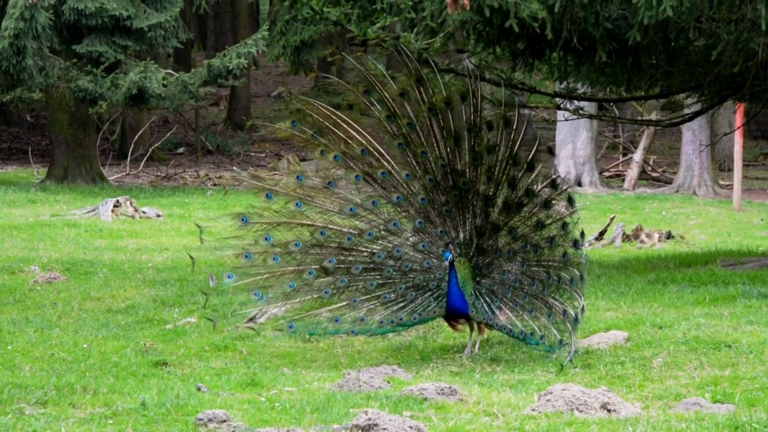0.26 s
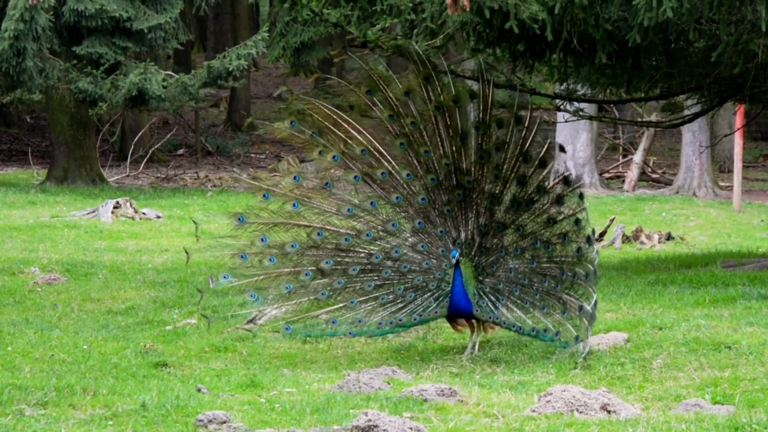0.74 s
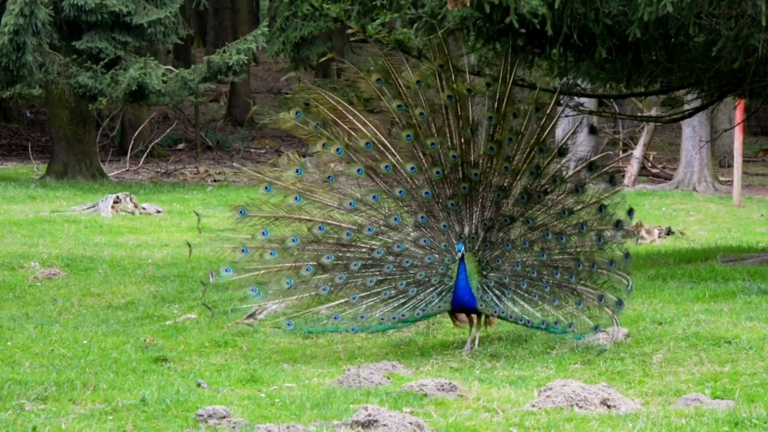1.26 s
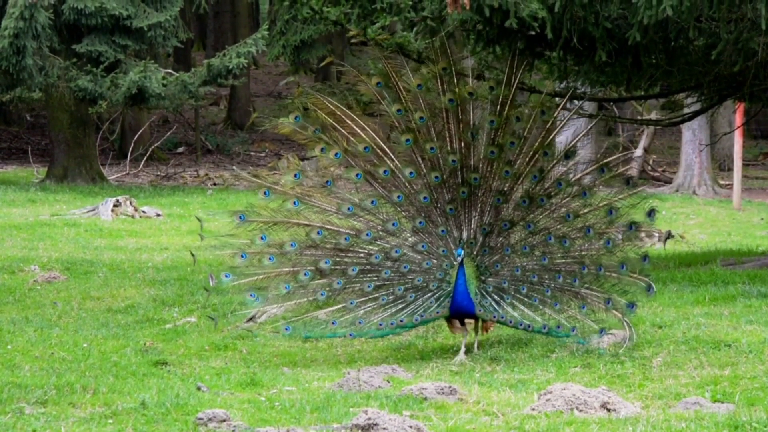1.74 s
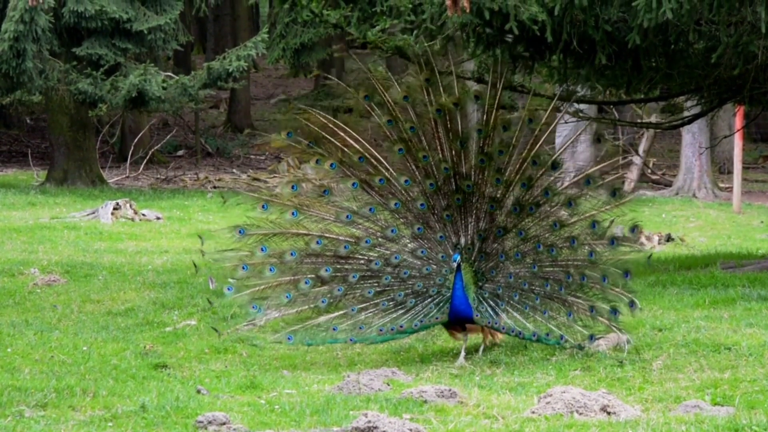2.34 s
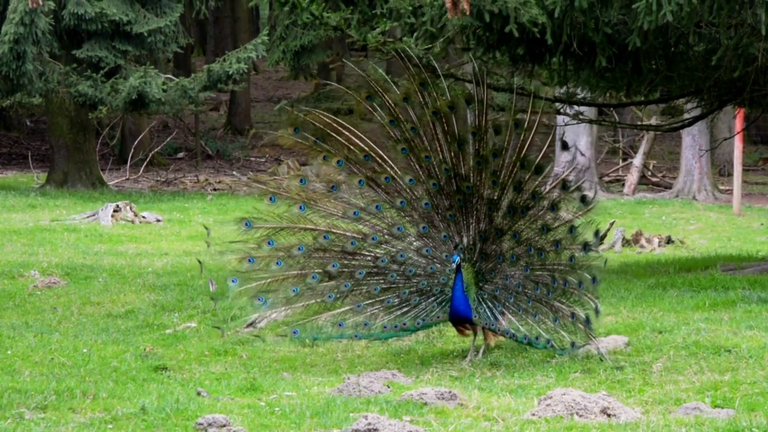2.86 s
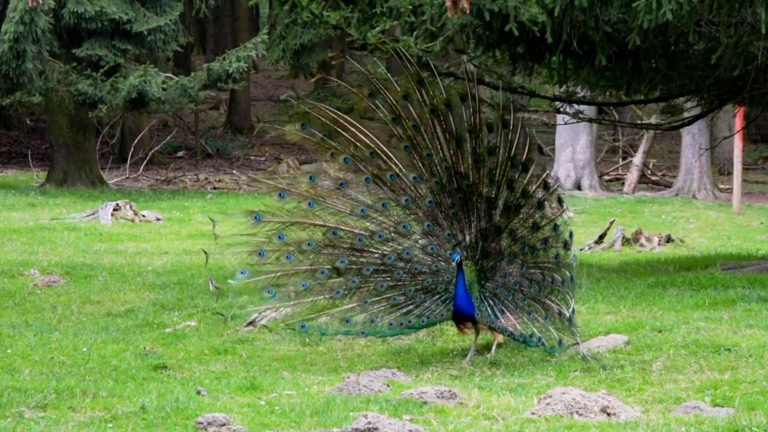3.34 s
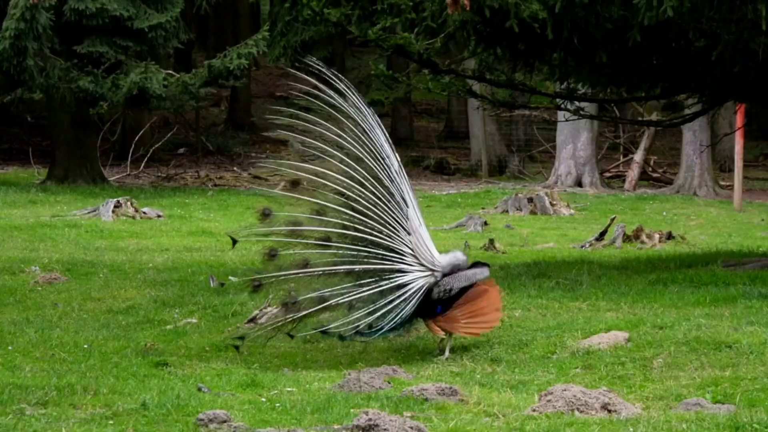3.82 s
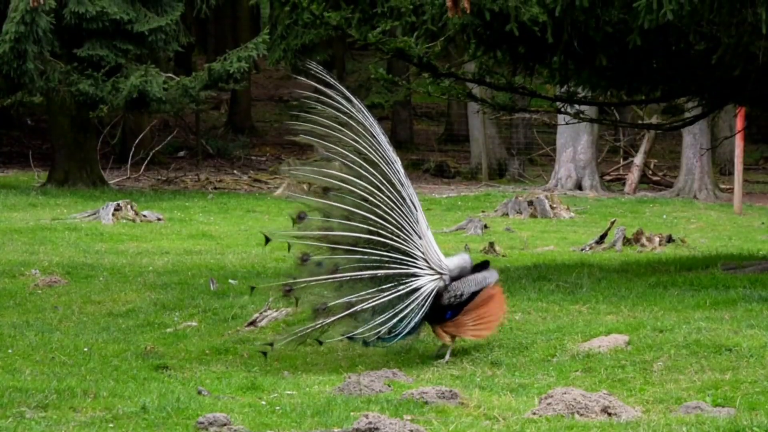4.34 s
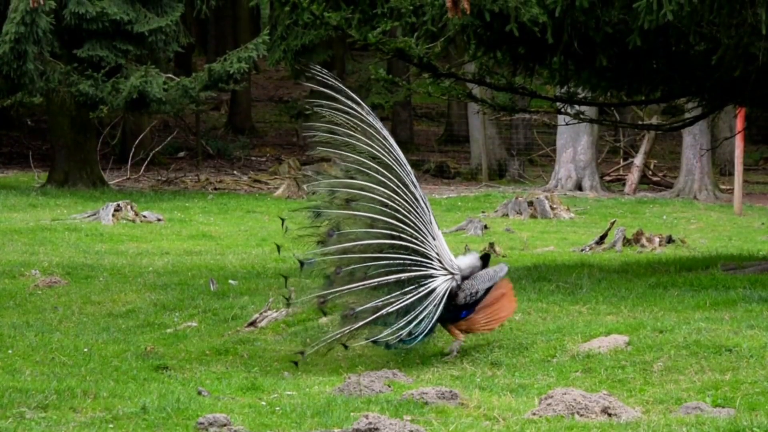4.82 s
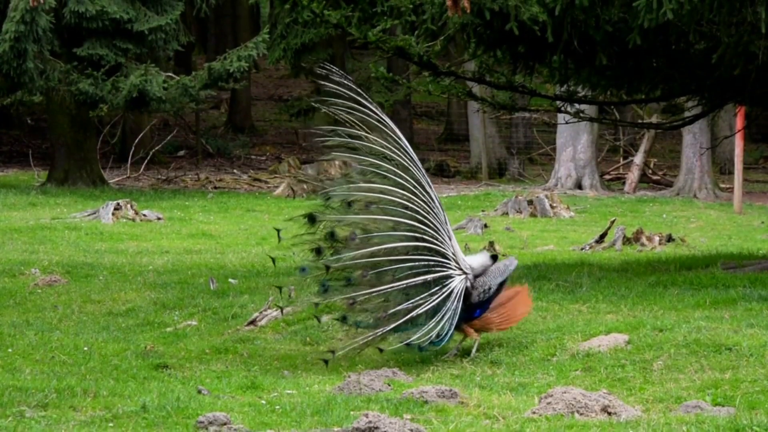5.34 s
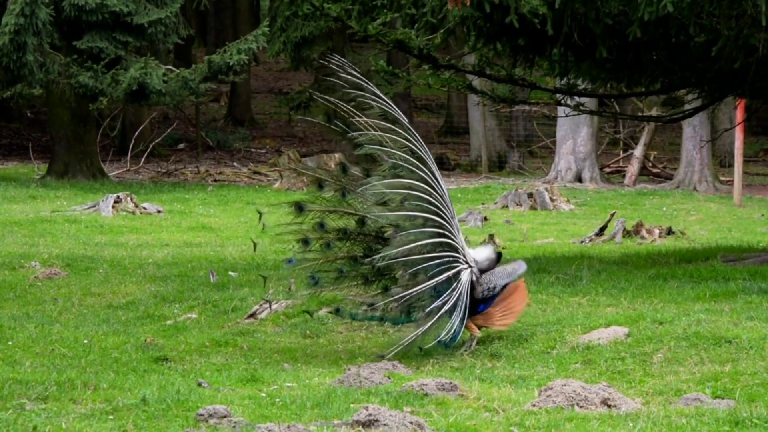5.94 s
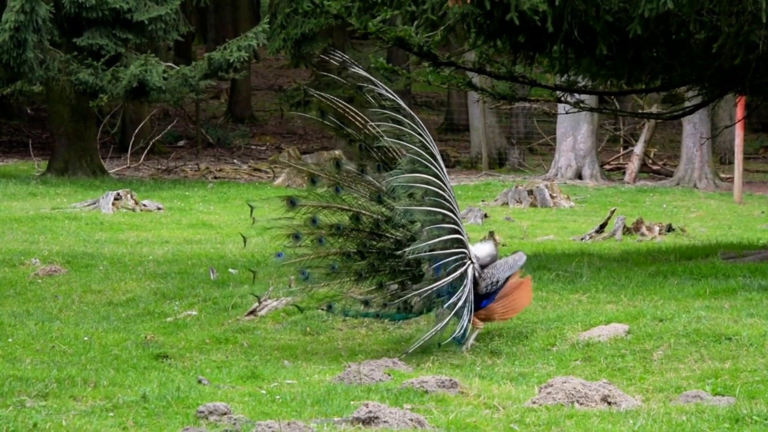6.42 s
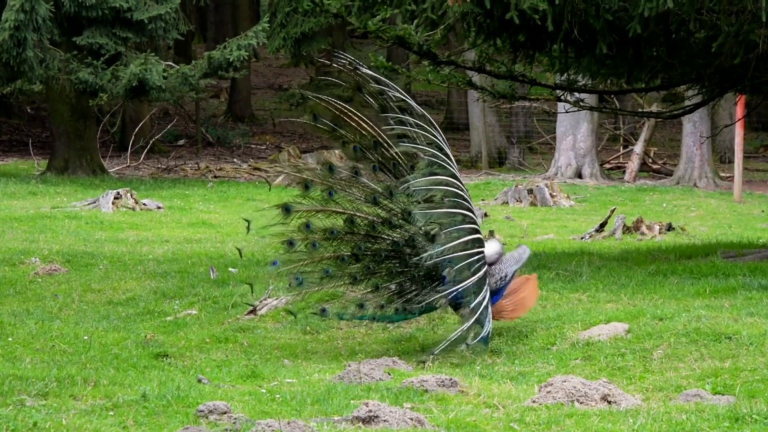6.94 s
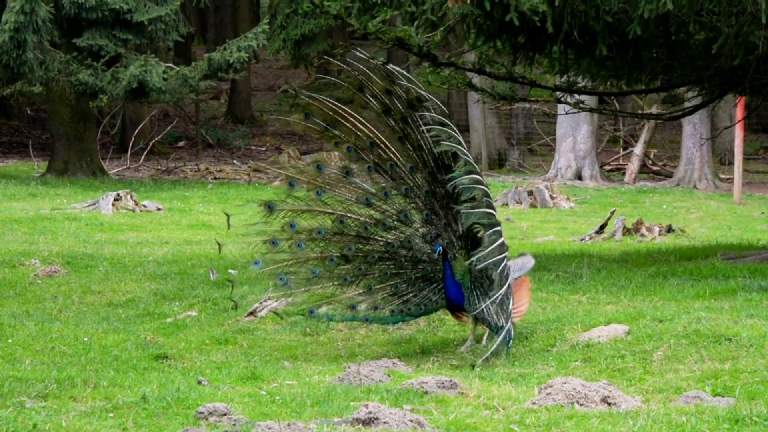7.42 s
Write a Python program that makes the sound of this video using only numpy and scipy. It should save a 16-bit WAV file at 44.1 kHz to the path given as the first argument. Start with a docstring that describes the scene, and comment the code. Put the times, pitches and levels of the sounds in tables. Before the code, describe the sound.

Close, clear outdoor pickup with almost no echo: loud, honking peacock wails separated by one to two seconds of near silence. Faint scratchy chirps of high hiss flit between and under them, slightly wide in stereo. A barely audible insect-like shimmer and weak low hum sit beneath. A crisp double click comes late, before the last cry.

```python
"""Outdoors, perhaps near trees: a peacock repeats one and the same wailing cry five times, close and dry,
the first already under way. The cry is a stack of throbbing partials, smeared by hoarseness.
Raspy bursts of treble hiss, perhaps small birds, are noise through a sliding resonance.
Below them: a faint insect-like band, a weak low hum and quiet air of shaped noise, and one double tick
of short ringing modes. Hiss and background drop out once, briefly."""
import sys
import numpy as np
from scipy import signal
from scipy.io import wavfile
from scipy.ndimage import uniform_filter1d

SR = 44100
rng = np.random.default_rng(int(sys.argv[2]) if len(sys.argv) > 2 else 0)


def unload_audio(sound):
    """Save the sound as a 16-bit wav file, at the path given as the first command line argument."""
    columns = np.transpose(np.atleast_2d(sound))
    # keep every value between -1 and 1, then stretch to whole-number steps
    steps = np.round(np.clip(columns, -1, 1) * 32767)
    wavfile.write(sys.argv[1], SR, steps.astype(np.int16))


N = 338688


def amp(db):
    """dB to amplitude."""
    return 10 ** (np.asarray(db) / 20)


def evened(x):
    """Scale to rms 1."""
    return x / np.sqrt(np.mean(x ** 2) + 1e-20)


def read(points, hz):
    """Interpolate a (f/Hz, value) table over log frequency."""
    f, value = np.transpose(points)
    return np.interp(np.log(hz + 1), np.log(f + 1), value)


def unit(db):
    """Spectrum columns scaled so that each frame has rms 1."""
    gain = amp(db)
    return gain / np.sqrt(np.mean(gain ** 2, axis=0)) / np.sqrt(len(gain))


def wander(count, width_hz):
    """Complex low-passed noise of rms 1; multiplying a tone by it smears the tone."""
    z = rng.standard_normal(count) + 1j * rng.standard_normal(count)
    z = signal.sosfilt(signal.butter(4, width_hz, fs=SR, output="sos"), z)
    return z / np.sqrt(np.mean(abs(z) ** 2))


def drift(t, span_s):
    """Slow random course of rms 1 that changes within about span_s."""
    return evened(uniform_filter1d(rng.standard_normal(len(t)), size=int(span_s / t[1]) + 1))


def patches(hz, t, bins, frames):
    """Random time-frequency map of rms 1, smoothed over bins and frames."""
    grid = rng.standard_normal((len(t), len(hz))).T
    grid = uniform_filter1d(grid, size=bins, axis=0)
    return evened(uniform_filter1d(grid, size=frames, axis=1))


def noise(shape, size, same):
    """Stereo noise from random short-time spectra; shape(hz, t) gives rms per bin, same the likeness."""
    hop = size // 4
    hz = np.fft.rfftfreq(size, 1 / SR)[:, None]
    t = np.arange(N // hop + 5) * hop / SR
    a, b, c, d = rng.standard_normal((len(t), len(hz), 4)).T
    same = np.clip(read(same, hz), 0, 1)
    mid = np.sqrt((1 + same) / 2) * (a + 1j * b)
    side = np.sqrt((1 - same) / 2) * (c + 1j * d)
    z = np.array([mid + side, mid - side]) * shape(hz, t)
    out = signal.istft(z, nperseg=size, noverlap=size - hop)[1][:, :N]
    return out * np.sqrt(3 / 2)  # window gain


# hum course: t/s, level/dB (before the waver)
HUM_LEVELS = [(0, -93.5), (1.5, -89), (2, -94), (3.5, -90), (4.5, -90.5), (5.62, -93), (5.8, -76),
              (6.5, -79), (7.06, -76), (7.68, -88)]
# air spectrum: f/Hz, relative level/dB
AIR_SPECTRUM = [(12, -36), (20, -3.5), (49, -17), (349, -6.5), (931, -20.5), (1620, -19.5), (2170, -12),
                (2680, -21), (3990, -8), (5210, -15), (6430, -1), (8170, -18), (11200, -18), (14600, -54),
                (22000, -120)]
HUM_SWING_DB, AIR_DB = 3.5, -76


def background():
    """Wavering narrow-band hum over quiet air, both patchy noise."""
    def shape(hz, t):
        patch = patches(hz, t, bins=30, frames=6)
        hum_band = unit(-30 * np.log10(1 + ((hz - 135) / 28) ** 2) - 12 * (hz < 100))
        hum_db = np.interp(t, *np.transpose(HUM_LEVELS)) + HUM_SWING_DB * drift(t, .1)
        hum = amp(hum_db) * amp(1.4 * patch) * hum_band
        air = amp(AIR_DB + 4.4 * patch) * unit(read(AIR_SPECTRUM, hz))
        return hum + air
    return noise(shape, size=2048, same=[(100, 0.97), (1000, 0.9), (5000, 0.77)])


# bursts: start t/s, length/s, level/dB, resonance start f/Hz, end f/Hz,
#         upper band/dB, lower band/dB (bands re resonance)
RASP_BURSTS = [(0.474, 0.094, -76, 5340, 5600, 1, 6), (0.718, 0.05, -69, 5600, 5800, -2, 3),
               (0.775, 0.17, -49.5, 5630, 4900, -5.5, -37), (0.937, 0.19, -67, 5300, 6060, -15, -8),
               (1.175, 0.21, -47.5, 5230, 5100, -9.5, -19), (1.99, .15, -78.5, 5400, 5600, -24, -1.5),
               (2.228, .13, -65.5, 5630, 5930, 3.5, -6), (2.576, 0.089, -81, 6700, 6700, 2, -5),
               (2.738, 0.18, -49.5, 5800, 5400, -6.5, -21.5), (3.644, 0.16, -52, 5320, 5120, -5, -30),
               (3.839, 0.16, -50, 6030, 4700, -15, -31), (3.989, 0.16, -53, 6120, 5260, -4.5, -16.5),
               (4.216, 0.16, -54, 5700, 5130, -4, -23), (4.4, 0.086, -71.5, 6200, 6000, -16, -9),
               (4.505, 0.13, -68.5, 5650, 5400, -17, -20), (5.272, 0.2, -50, 5430, 4870, -14, -19.5),
               (5.832, 0.17, -54, 4960, 5150, -8, -17), (6.03, 0.18, -51, 6430, 4760, -7, -22),
               (6.239, 0.034, -67.5, 5200, 5250, 5.5, -20.5), (6.444, .06, -59.5, 5800, 6970, -24, -41),
               (6.505, 0.061, -62, 4740, 4700, -10, -13), (6.564, .14, -71, 5170, 6500, -6, -5),
               (6.747, 0.15, -55, 5200, 4960, -5.5, -22.5), (6.9, 0.13, -72, 5600, 6000, 8.5, -7),
               (7.61, 0.11, -49, 5100, 5100, -11, -14) ]
# band spectra: f/Hz, relative level/dB
UPPER_BAND = [(3820, -31), (6500, -6.5), (7290, -2.5), (7590, -3), (8390, 0), (8950, -0.5), (9140, -4.5),
              (10100, 2), (11200, -4.5), (14600, -34.5), (22000, -120)]
LOWER_BAND = [(700, -71), (1400, -30), (2000, -12), (2800, -10), (3700, -0.5), (4400, 0.5), (5200, -29.5),
              (7000, -60.5)]
# left-right likeness: f/Hz, likeness (0-1)
RASP_LIKENESS = [(2000, 1), (5000, 0.52), (10000, 0.33), (12000, 1)]
RASP_RISE_S, RASP_FALL_S, RASP_EDGE_DB, RASP_WIDTH_HZ = 0.042, 0.052, -12, 800
FAINT_DB, FAINT_HZ, FAINT_WIDTH_HZ = -81.5, 6430, 350  # insect-like band
FAINT_SIDES_DB, FAINT_SWING_DB = -10.5, 7


def rasps():
    """Patchy hiss through a sliding resonance with bands above and below, plus the faint band."""
    start, length, level_db, from_hz, to_hz, upper_db, lower_db = np.transpose(RASP_BURSTS)[:, :, None]

    def shape(hz, t):
        since, left = t - start, start + length - t
        edge = np.maximum(np.maximum(1 - since / RASP_RISE_S, 1 - left / RASP_FALL_S), 0)
        bursts = amp(level_db + RASP_EDGE_DB * np.minimum(edge, 8) ** 2.4)
        faint = amp(FAINT_DB + FAINT_SWING_DB * drift(t, 0.091))
        slide_hz = from_hz + (to_hz - from_hz) * np.clip(since / length, 0, 1)
        # level-weighted mean of bursts and faint band
        level = bursts.sum(0) + faint
        centre_hz = ((bursts * slide_hz).sum(0) + faint * FAINT_HZ) / level
        width_hz = (bursts.sum(0) * RASP_WIDTH_HZ + faint * FAINT_WIDTH_HZ) / level
        upper = (bursts * amp(upper_db)).sum(0) + faint * amp(FAINT_SIDES_DB)
        lower = (bursts * amp(lower_db)).sum(0) + faint * amp(FAINT_SIDES_DB)
        core = unit(-24 * np.log10(1 + ((hz - centre_hz) / width_hz) ** 2) - 14 * (hz < 4200))
        bands = upper * unit(read(UPPER_BAND, hz)) + lower * unit(read(LOWER_BAND, hz))
        flicker = amp(5.4 * patches(hz, t, bins=2, frames=9) + 0.74 * drift(t, .012))
        return flicker * (level * core + bands)
    return noise(shape, size=256, same=RASP_LIKENESS)


# ticks: t/s, peak level/dB
TICK_TIMES = [(5.75, -34.5), (5.7529, -27)]
# ringing modes: f/Hz, relative level/dB, t60/s
TICK_RINGING = [(2400, -6, 0.0046), (4850, -1, 0.002), (10300, 1.5, 0.0039), (13900, -12, .003)]


def ticks():
    """Two dry ticks, each a sum of short decaying modes."""
    t, out = np.arange(600) / SR, np.zeros(N)
    ring = sum(amp(db - 60 * t / t60) * np.sin(2 * np.pi * hz * t) for hz, db, t60 in TICK_RINGING)
    ring *= np.minimum(t / 0.00037, 1)  # attack
    for s, db in TICK_TIMES:
        out[round(s * SR):][:len(t)] += amp(db) * ring / abs(ring).max()
    return out


# one cry: t/s, pitch f/Hz, partial 1 level/dB, partial 2 level/dB, partial 3 level/dB, treble level/dB
CRY_COURSE = [(.052, 588, -74, -72, -72, -65), (.07, 593.3, -46, -39, -80, -69.5),
              (.118, 601.2, -37.5, -31, -66, -46.5), (.132, 612.7, -41, -23, -54, -45),
              (.14, 612, -45.5, -13, -45, -27), (0.154, 639, -47.5, -10, -40, -30.5),
              (.26, 659, -40, -10.5, -33.5, -23), (.31, 653.6, -39, -13.5, -29, -21.5),
              (.345, 646.6, -35.5, -13, -20.5, -20), (.39, 643.5, -35.5, -12, -23.5, -20),
              (.45, 656.3, -34.5, -14, -20, -21.5), (.56, 662.2, -28.5, -17.5, -18.5, -19.5),
              (.63, 664.2, -28.5, -15.5, -16.5, -20), (.68, 661.3, -29, -14, -21, -21.5),
              (0.732, 648.5, -29, -18.5, -25, -23.5), (.765, 637, -34, -16.5, -24, -29),
              (.795, 618, -44.5, -37, -45, -44.5), (0.829, 650, -60.5, -34.5, -52.5, -48.5),
              (.885, 654, -62, -55.5, -52, -52), (.905, 640, -96, -49, -68, -67)]
# treble share, a row per partial 4-16, a column per beak posture: level/dB
BEAK_SHARES = [(-12, -8, -18.5, -13, -11), (-15, -9.5, -6, -9.5, -13), (-4.5, -15.5, -18.5, -6.5, -8),
               (-12, -5, -7, -20, -10), (-29.5, -16.5, -9.5, -9, -8), (-16, -9.5, -20.5, -11, -8),
               (-13.5, -14.5, -6, -13, -14.5), (-23, -10, -16.5, -14, -11.5),
               (-24.5, -15.5, -11.5, -15.5, -9), (-13.5, -21.5, -17, -20, -21.5),
               (-23, -17.5, -18, -18, -18.5), (-22, -21, -14.5, -16.5, -18.5),
               (-25, -19, -16.5, -19.5, -17.5)]
# postures reached: t/s
POSTURE_TIMES = [.14, .31, .495, .59, .71]
TREBLE_OPEN_S, TREBLE_SHUT_S = 0.13, 0.75
FADE_S, FADE_HALF_S, FADE_DB = .495, .022, -16  # partial 4 dips briefly


def contours(t):
    """Pitch and the levels of the 16 partials; the beak posture shares out the treble."""
    s, *columns = np.transpose(CRY_COURSE)
    hz, first_db, second_db, third_db, treble_db = (np.interp(t, s, c) for c in columns)
    treble_db = treble_db - 1200 * np.maximum(TREBLE_OPEN_S - t, 0)  # dB/s
    treble_db = treble_db - 60 * np.maximum(t - TREBLE_SHUT_S, 0)
    levels_db = [first_db, second_db, third_db]
    levels_db += [treble_db + np.interp(t, POSTURE_TIMES, db) for db in BEAK_SHARES]
    levels_db[3] = levels_db[3] + FADE_DB * np.exp(-((t - FADE_S) / FADE_HALF_S) ** 2)
    return hz, levels_db


# throb rate: t/s, rate f/Hz
THROB_RATE = [(.15, 53.7), (.29, 45), (.45, 45), (.685, 46.3), (.81, 55.4), (.9, 56)]
# throb: t/s, depth in partials 1-2 (0-1), depth above (0-1), pitch swing/Hz
THROB_DEPTH = [(.07, .8, .3, 3), (.125, .7, .3, 3), (.15, .22, .1, 3), (.31, .15, .45, 3),
               (.345, .04, .12, 2.5), (.5, .04, .12, 2), (.66, .03, .1, 1.5), (.77, .3, .3, 3),
               (.9, .45, .3, 3)]
THROB_START_TURNS = .727


def throb(t, hz):
    """Throb phase, its depths, and the running pitch phase that swings with it."""
    when, *depths = np.transpose(THROB_DEPTH)
    low_depth, high_depth, swing_hz = (np.interp(t, when, c) for c in depths)
    rate_hz = np.interp(t, *np.transpose(THROB_RATE)) * (t > CRY_COURSE[0][0])
    beat = 2 * np.pi * (THROB_START_TURNS + np.cumsum(rate_hz) / SR)
    turns = np.cumsum(hz + swing_hz * np.cos(beat + 1.9)) / SR
    return beat, low_depth, high_depth, turns


# hoarseness: t/s, partials 1-2 (0-1), factor per partial number above them
HOARSENESS = [(.12, .25, .17), (.15, .05, .16), (.25, .04, .13), (.36, .012, .03), (.64, .01, .025),
              (.77, .07, .09), (.81, .5, .25)]
# stereo spread: f/Hz, side level/dB re partial
CRY_SPREAD = [(1300, -79), (2000, -47.5), (2700, -25.5), (4000, -19), (7000, -17), (8600, -12.5),
              (10500, -13.5)]
WEAK_THROB_PER_DB = .02  # extra depth below a partial's own peak level


def partials(t, hz, levels_db, beat, low_depth, high_depth, turns):
    """Throbbing partials; hoarseness trades pure tone for a smeared one."""
    when, *kinds = np.transpose(HOARSENESS)
    low_rough, step_rough = (np.interp(t, when, c) for c in kinds)
    mid, side = np.zeros((2, SR))
    for k, db in enumerate(levels_db, 1):
        if k < 3:
            depth, slip, waver_db, hoarse = low_depth, beat, 0, low_rough
        else:
            weak = WEAK_THROB_PER_DB * (db.max() - db) * (t < TREBLE_SHUT_S)
            depth = np.minimum(high_depth + weak, .85)
            slip = beat + 0.55 * rng.standard_normal()  # rad, out of step
            waver_db = 2.5 * wander(SR, 12).real
            hoarse = np.tanh(step_rough * k)
        pulse = np.maximum(1 + depth * np.cos(slip), .05) / np.sqrt(1 + depth ** 2 / 2)
        level = np.sqrt(2) * amp(db + waver_db) * pulse
        tone = level * np.exp(2j * np.pi * (k * turns + rng.random()))
        pure = np.sqrt(1 - np.clip(hoarse, 0, 1) ** 2)
        mid += (tone * (pure + hoarse * wander(SR, 70 + 12.0 * k))).real
        side += (tone * amp(read(CRY_SPREAD, k * hz)) * wander(SR, 14)).real
    return mid, side


def breath(turns, second_db, third_db):
    """Noise carried by the partials: wide around 2, narrower skirts on 2 and 3."""
    out = np.zeros(SR)
    for k, db, relative_db, width_hz in ((2, second_db, -45, 600), (2, second_db, -25, 192),
                                         (3, third_db, -25, 192)):
        out += amp(db + relative_db) * (np.exp(2j * np.pi * k * turns) * wander(SR, width_hz)).real
    return out


def lead_in(t):
    """Short smeared second note in the soft lead-in."""
    note = (np.exp(2j * np.pi * 790 * t) * wander(SR, 30)).real
    return amp(-43.5) * note * np.exp(-((t - .08) / 0.041) ** 2)


def thump(t):
    """Soft low push as the voice breaks open: a sine under a bell envelope."""
    at_s, hz, db, half_s = .148, 300, -59, .0035
    return amp(db) * np.sin(2 * np.pi * hz * t) * np.exp(-((t - at_s) / half_s) ** 2)


CRY_LOW_HZ, CRY_TOP_HZ = 470, 11000


def cry():
    """One stereo cry: partials, breath and lead-in high-passed, thump added, then low-passed."""
    t = np.arange(SR) / SR
    hz, levels_db = contours(t)
    beat, low_depth, high_depth, turns = throb(t, hz)
    mid, side = partials(t, hz, levels_db, beat, low_depth, high_depth, turns)
    mid += breath(turns, levels_db[1], levels_db[2]) + lead_in(t)
    mid = signal.sosfiltfilt(signal.butter(5, CRY_LOW_HZ, "high", fs=SR, output="sos"), mid)
    mid += thump(t)
    first_s, last_s = CRY_COURSE[0][0], CRY_COURSE[-1][0]
    ends = np.clip((t - first_s) / 0.0056, 0, 1) * np.clip((last_s - t) / 0.0054, 0, 1)
    top = signal.firwin(301, CRY_TOP_HZ, window=("kaiser", 8), fs=SR)
    return signal.oaconvolve(np.array([mid + side, mid - side]) * ends, top[None], "same")


# zero of each cry's clock: t/s
CRY_TIMES = [-.48, 1.09, 2.74, 4.5, 6.8495]


def peacock():
    """The same cry at every start."""
    one, out = cry(), np.zeros((2, N + 2 * SR))
    for s in CRY_TIMES:
        at = round((s + 1) * SR)  # 1 s of padding ahead
        out[:, at:at + one.shape[1]] += one
    return out[:, SR:SR + N]


HUSH_FROM_S, HUSH_TO_S = 5.468, 5.515


def scene():
    """Mix; hiss and background drop by 40 dB during the hush."""
    t = np.arange(N) / SR
    hush = np.clip(np.maximum((HUSH_FROM_S - t) / 0.0074, (t - HUSH_TO_S) / .02), .01, 1)
    return hush * (background() + rasps()) + ticks() + peacock()


EDGE_HZ = 15400


def record(dry):
    """A short fade-in, then the band limit."""
    dry = dry * np.minimum(np.arange(N) / SR / .002, 1)
    edge = signal.firwin(511, EDGE_HZ, window=("kaiser", 9), fs=SR)
    return signal.oaconvolve(dry, edge[None], "same")


dry = scene()
out = record(dry)
unload_audio(out)
```